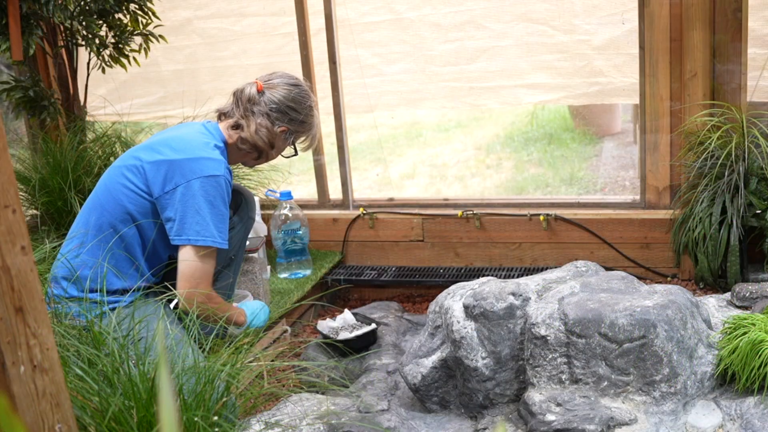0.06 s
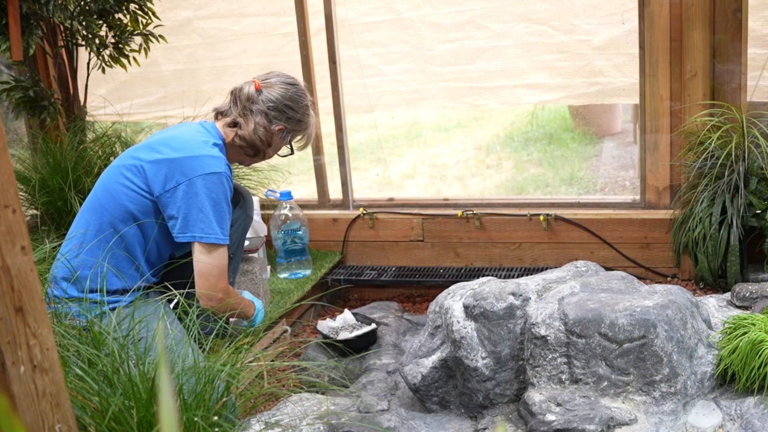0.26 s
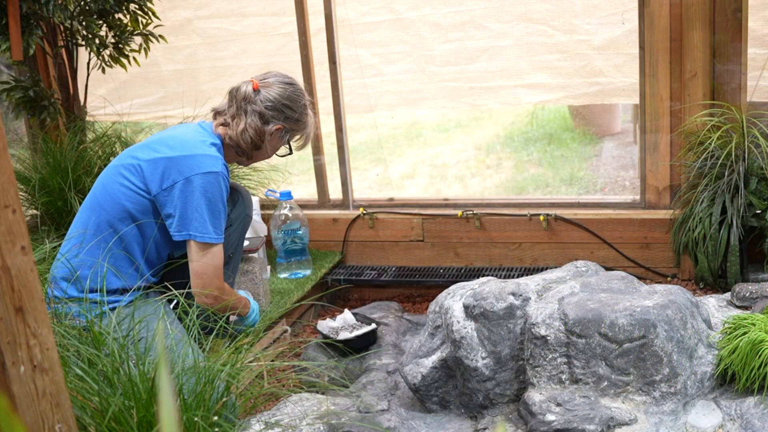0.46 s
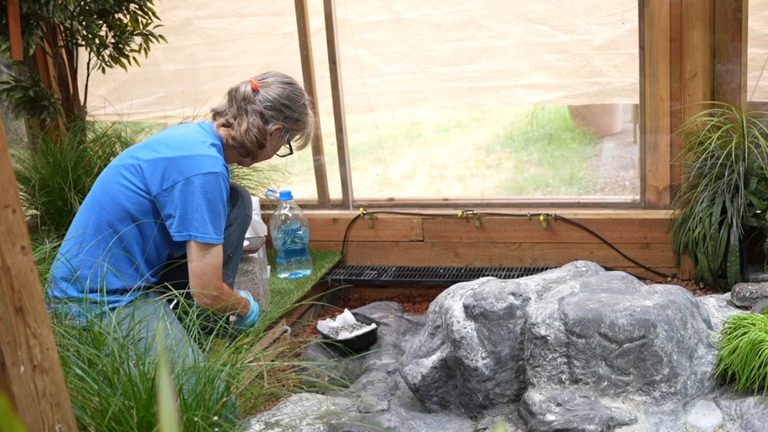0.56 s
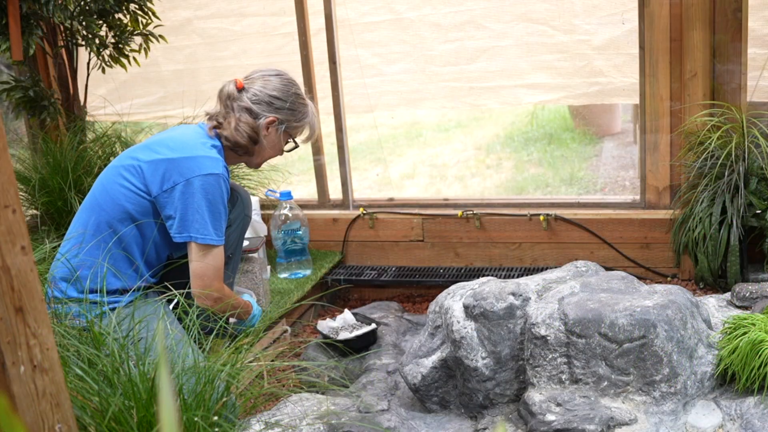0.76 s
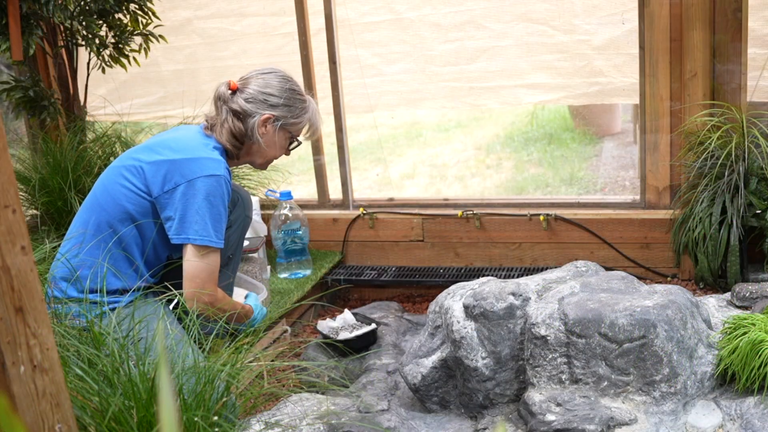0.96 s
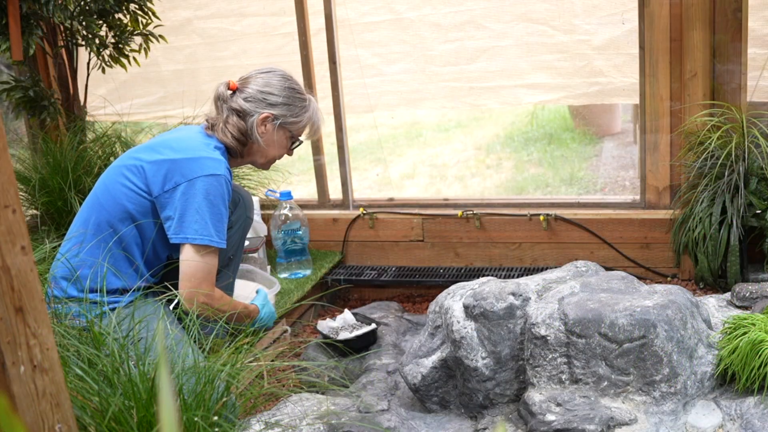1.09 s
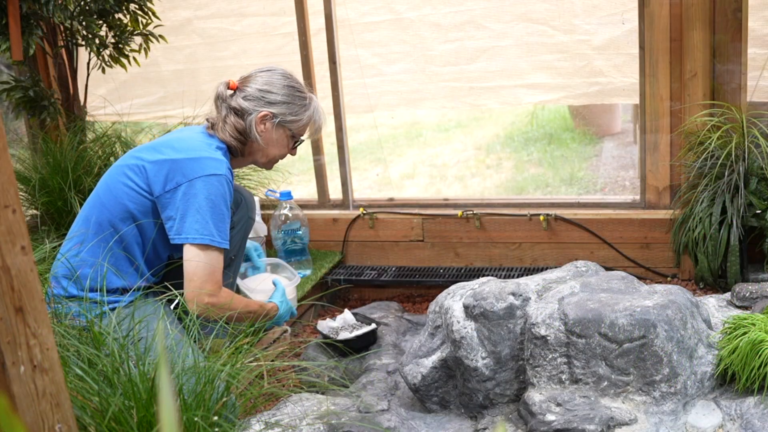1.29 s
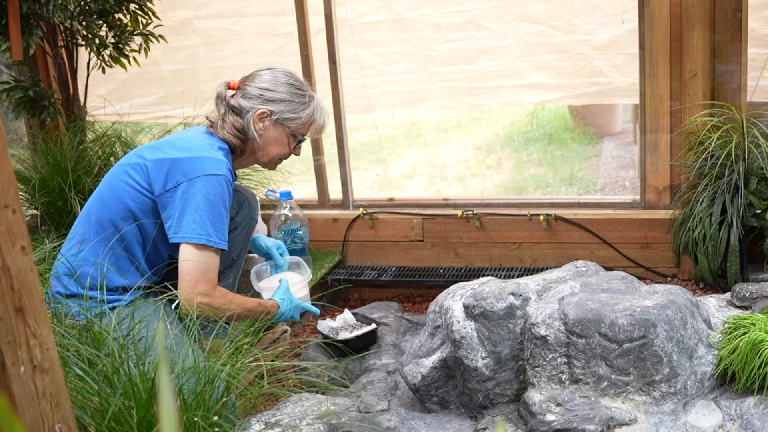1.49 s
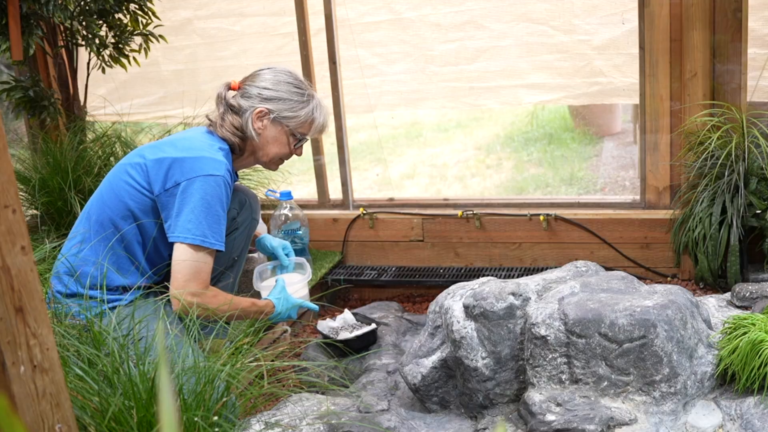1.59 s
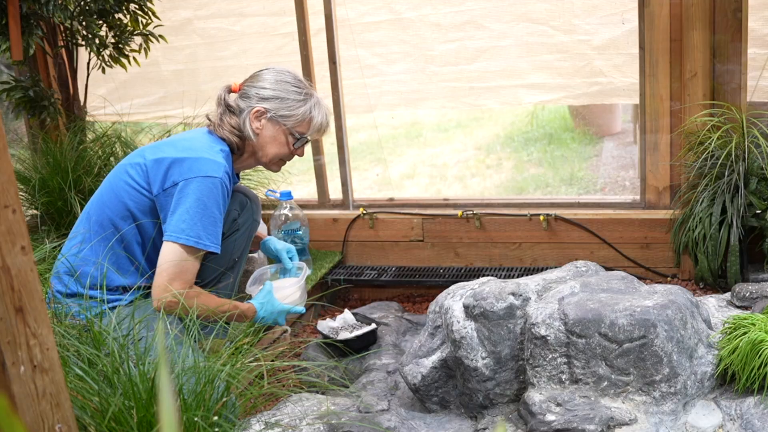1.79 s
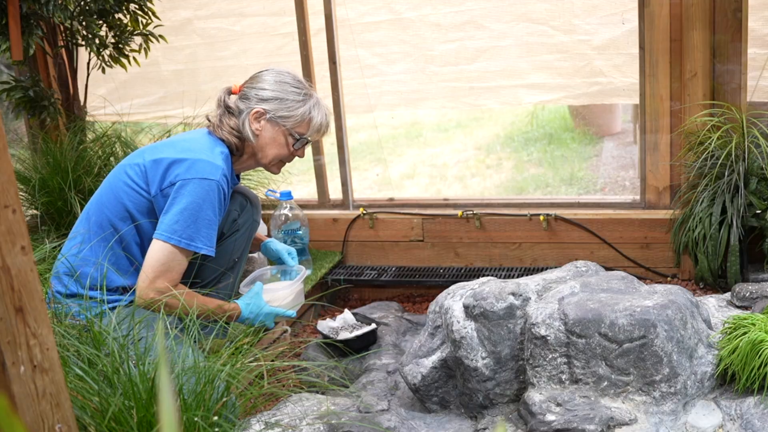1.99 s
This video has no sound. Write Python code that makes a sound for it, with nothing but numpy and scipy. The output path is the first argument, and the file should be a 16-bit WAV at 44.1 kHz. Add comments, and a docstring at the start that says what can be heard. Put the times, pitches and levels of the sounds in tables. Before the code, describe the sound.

Small finches give clear, high gliding chirps, slightly left, at about 0.2, 0.26 and 0.45 seconds, then a last one at 1.75, each blurred by glass panes and a short hall tail. A soft dull double bump falls at 0.3. A hand swishes through a bag from 0.5 to 0.9, then loose grain rustles and ticks, fading after 1.5. Faint steady pump hum and room air continue throughout.

```python
"""A glazed indoor aviary in which small finches chirp, their gliding sines ringing off panes and hall.
Close by something bumps softly (noise in dull resonances) and a hand swishes through a bag
(grainy noise with a sliding hollow). Loose grain rustles and ticks (tiny clicks and bursts of noise).
A pump hums faintly (wavering sine lines) over the air of the room (steady coloured noise)."""
import sys
import numpy as np
from scipy import signal
from scipy.fft import rfft, irfft, next_fast_len
from scipy.io import wavfile
from scipy.ndimage import map_coordinates

SR = 44100
rng = np.random.default_rng(int(sys.argv[2]) if len(sys.argv) > 2 else 0)


def store_pcm(level_fs):
    """Save levels as 16-bit WAV."""
    pcm = np.round(np.clip(level_fs, -1, 1) * 32767).astype(np.int16)
    wavfile.write(sys.argv[1], SR, np.atleast_2d(pcm).T)


def makeup_ratio(level_db):
    """Linear amplitude ratio for a level in decibels (20 dB per factor of ten)."""
    decades = np.asarray(level_db, float) / 20
    return 10 ** decades


N = 90404  # samples, about 2 s


def unit(x):
    """Scale to rms 1."""
    return x / np.sqrt(np.mean(x ** 2) + 1e-20)


def along(points, hz):
    """Read a curve of (Hz, value) points on a log frequency axis."""
    f, v = np.transpose(points)
    return np.interp(np.log(hz + 1), np.log(f + 1), v)


def curves(rows):
    """One value per sample for each column after the time."""
    s, *cols = np.transpose(rows)
    return [np.interp(np.arange(N) / SR, s, c) for c in cols]


def wobble(rate):
    """A smooth random curve, rate knots a second."""
    return map_coordinates(rng.standard_normal(N // 100), [np.arange(N) * rate / SR])


def filtered(x, response):
    """Filter x by a response given as a function of frequency."""
    m = next_fast_len(N + 8192)
    return irfft(rfft(x, m) * response(np.fft.rfftfreq(m, 1 / SR)), m)[..., :N]


def spread(pair, spectrum):
    """Two unrelated noises coloured and mixed to a left-right likeness, rms 1."""
    # How alike left and right are. Each row: frequency in Hz, correlation (1 is identical).
    likeness = [(40, .985), (120, .92), (350, .9), (700, .7), (1400, .52), (2800, .05), (6000, .1),
                (15000, .08)]

    def response(hz):
        turn = np.arccos(np.clip(along(likeness, hz), -1, 1)) / 2
        return makeup_ratio(along(spectrum, hz)) * [np.cos(turn), np.sin(turn)]

    mid, side = filtered(pair, response)
    return unit(np.array([mid + side, mid - side]))


def hall(x):
    """A fresh stereo noise tail in which each frequency dies at its own speed."""
    # Decay of the hall. Each row: frequency in Hz, time to fall 60 dB in seconds.
    decay = [(150, 0.43), (1500, 1), (5000, 0.44), (7000, 0.32), (14000, 0.42)]
    first_wall_s = 0.0056
    hz, t, z = signal.stft(rng.standard_normal((2, SR * 2 // 3)), SR, nperseg=256)
    tail = signal.istft(z * makeup_ratio(-60 * t / along(decay, hz)[:, None]), SR, nperseg=256)[1]
    tail = tail / np.linalg.norm(tail[0])
    tail = np.pad(tail, ((0, 0), (int(first_wall_s * SR), 0)))
    return signal.fftconvolve(x[None], tail, axes=1)[:, :N]


def rise_fade(s, db, rise, t60):
    """Linear rise from s to the level db, then an exponential fade of 60 dB in t60 seconds."""
    t = np.arange(N) / SR
    return makeup_ratio(db - 60 * np.clip(t - s - rise, 0, 9) / t60) * np.clip((t - s) / rise, 0, 1)


def burst(s, db, rise, t60, hz, width):
    """Stereo noise in one resonance, under a rise and a fade."""
    steps = hz + width * np.array([-4, -2, -1, -.5, 0, .5, 1, 2, 4, 8, 30])
    band = [(max(f, 5), -20 * np.log10(1 + (2 * (f - hz) / width) ** 2)) for f in steps]
    return rise_fade(s, db, rise, t60) * spread(rng.standard_normal((2, N)), band)


def near_panes(voice):
    """Eight sparse echoes a side within 20 ms, as from panes and posts, rms 1."""
    walls = np.zeros((2, int(.02 * SR) + 1))
    for side in walls:
        side[rng.integers(40, len(side), size=8)] = rng.choice([-1, 1], size=8)
    return unit(signal.fftconvolve(voice[None], walls, axes=1)[:, :N])


def finches():
    """Gliding whistles with a weak octave, each from its own perch, blurred by near panes and the hall."""
    # One list a chirp. Each row: time in seconds, pitch in Hz, level in dB,
    # second harmonic in dB relative to the first.
    chirps = [
        [(.186, 6300, -57, -33.5), (.193, 7280, -48, -31), (.201, 6850, -29.5, -31), (.205, 6020, -43, -24.5),
         (.208, 5220, -44.5, -20), (.211, 4230, -60, -38), (.213, 4240, -63.5, -41.5)],
        [(.259, 5760, -67, -58), (.265, 6136, -39, -21.5), (.28, 6183, -32.5, -43.5), (.297, 6666, -36, -50),
         (.32, 6618, -32.5, -58.5), (.333, 6400, -30.5, -23), (.34, 5860, -36.5, -37.5), (.344, 5050, -52, -50),
         (.348, 4460, -58, -54)],
        [(.45, 5070, -65, -26), (.458, 5300, -44, -13.5), (.47, 5680, -36, -32), (.485, 6180, -36.5, -22),
         (.498, 6534, -28.5, -42), (.51, 6560, -32, -33), (.525, 6465, -33, -47), (.534, 5950, -37, -58),
         (.543, 5360, -42, -52)],
        [(1.732, 7200, -63, -35), (1.744, 6690, -44.5, -51), (1.755, 6550, -47, -27), (1.775, 6790, -41, -11.5),
         (1.795, 7076, -32, -29), (1.815, 7024, -34, -35), (1.83, 6710, -37.5, -16), (1.845, 6050, -40.5, -57),
         (1.855, 5680, -61, -33)],
    ]
    # Perch of each chirp: left minus right in dB.
    perches = [-5, -8.5, -9.5, -6.5]
    panes_db, hall_db = -4, 3  # relative to the rms of the direct chirp
    flutter_db, edge_s = 1.5, .003  # random level flutter; soft start and stop
    out, t = np.zeros((2, N)), np.arange(N) / SR
    for rows, pan_db in zip(chirps, perches):
        hz, db, octave_db = curves(rows)
        phase = 2 * np.pi * np.cumsum(hz) / SR
        whistle = np.sin(phase) + makeup_ratio(octave_db) * np.sin(2 * phase)
        on = np.clip(np.minimum(t - rows[0][0], rows[-1][0] - t) / edge_s, 0, 1)
        voice = on * np.sqrt(2) * makeup_ratio(db + flutter_db * wobble(120)) * whistle
        direct = voice * makeup_ratio([[pan_db / 2], [-pan_db / 2]])
        room = makeup_ratio(panes_db) * near_panes(voice) + makeup_ratio(hall_db) * unit(hall(voice))
        out += direct + np.std(voice) * room
    return out


def bag_ring():
    """Noise in narrow resonances, a brief ring of the bag with some hall."""
    # Ringing of the bag. Each row: centre in Hz, width in Hz, relative level in dB.
    modes = [(1550, 50, -2), (1810, 90, 3)]
    start_s, hold_s, level_db = .637, .05, -51

    def response(f):
        return sum(makeup_ratio(g) * w * w / (w * w + 4 * (f - c) ** 2) / np.sqrt(w) for c, w, g in modes)

    u = (np.arange(N) / SR - start_s) / hold_s
    ring = makeup_ratio(level_db) * unit(filtered(rng.standard_normal(N), response))
    ring = ring * np.clip(8 * u, 0, 1) * np.exp(-4 * np.clip(u - 1, 0, 9))
    return ring + makeup_ratio(-7) * hall(ring)


def swish():
    """Grainy rubbing noise with a hollow resonance that slides, and a brief ring of the bag."""
    # The hand's strokes. Each row: time in seconds, level of the body in dB,
    # centre of the hollow in Hz, hollow over the body in dB.
    strokes = [(.44, -70.5, 1960, 2), (.48, -55.5, 1930, -8), (.52, -57.5, 3840, -1),
               (.56, -50, 3930, -4.5), (.585, -52.5, 3800, 4.5), (.61, -51.5, 2970, 4.5),
               (.635, -44, 2030, -25), (.655, -44.5, 4000, -1), (.70, -41.5, 2420, -6.5),
               (.74, -43, 2140, -13), (.8, -46, 1390, -22), (.85, -53, 1110, -3), (.93, -61.5, 1210, -24),
               (1.02, -71.5, 1220, -11)]
    # Colour of the rubbing. Each row: frequency in Hz, relative level in dB per Hz.
    body_colour = [(530, -57), (900, -22), (1360, -20.5), (1510, -12), (1850, -10), (2250, -11),
                   (6430, -12.5), (7850, -18.5), (15000, -26)]
    hollow_share = .17  # half width over centre
    db, centre_hz, hollow_db = curves(strokes)
    grain = makeup_ratio(1.2 * wobble(300) + 0.2 * wobble(24.6))
    body = spread(rng.standard_normal((2, N)) * grain, body_colour)
    hz, t, z = signal.stft(rng.standard_normal((2, N)) * grain, SR, nperseg=256)
    centre = np.interp(t, np.arange(N) / SR, centre_hz)
    peak = 1 / (1 + ((hz[:, None] - centre) / (hollow_share * centre)) ** 2) / np.sqrt(centre)
    a, b = signal.istft(z * peak, SR, nperseg=256)[1][:, :N]
    hollow = unit(np.array([a + 1.8 * b, 0.77 * (a - 1.2 * b)]))  # wide, a little louder on the left
    return makeup_ratio(db) * (body + makeup_ratio(hollow_db) * hollow) + bag_ring()


def thud():
    """Soft bumps on a dull body: one noise for each resonance, kicked by every bump."""
    # The bumps. Each row: start in seconds, level in dB before the gain of each resonance.
    bumps = [(.285, -49), (.302, -48), (.335, -60)]
    # The dull body. Each row: centre in Hz, width in Hz, gain in dB, time to fall 60 dB in seconds.
    modes = [(90, 38, -11, .7), (187, 130, -2, 0.26), (300, 170, 3, 0.33), (557, 190, -1.5, 0.54),
             (1050, 520, -3.5, 0.44), (1710, 1200, -7, .25)]
    rise_s = .002
    t = np.arange(N) / SR

    def kick(t60):
        power = 0
        for s, db in bumps:
            fade = makeup_ratio(db - 60 * np.clip(t - s, 0, 9) / t60)
            power = power + (fade * np.clip((t - s) / rise_s, 0, 1)) ** 2
        return np.sqrt(power)

    # a burst begun at -1 s with an endless fade is a steady noise
    return sum(kick(t60) * burst(-1, g, 1, 1e6, hz, width) for hz, width, g, t60 in modes)


def rustle():
    """Short slides of loose grain: dense tiny clicks under a rise and a fade, with scuffs and ticks."""
    # Slides of grain. Each row: start in seconds, level in dB, rise in seconds,
    # time to fall 60 dB in seconds.
    slides = [(.455, -76, 0.025, 0.9), (.84, -55.5, 0.025, 1), (.92, -58.5, 0.038, 0.45),
              (1.058, -60.5, 0.018, 0.58), (1.148, -54.5, 0.02, 0.69), (1.319, -57, 0.026, 0.68),
              (1.51, -63.5, 0.021, 0.53), (1.82, -89, .01, 0.089)]
    # Colour of the grain. Each row: frequency in Hz, relative level in dB per Hz.
    grain_colour = [(1180, -48), (2000, -7.5), (2590, -10), (2900, -13), (4690, -6.5), (6970, -2),
                    (15700, -8.5)]
    # Scuffs and ticks, noise in one resonance. Each row: start in seconds, level in dB,
    # rise in seconds, time to fall 60 dB in seconds, centre in Hz, width in Hz.
    scuffs = [(.465, -55.5, 0.017, 0.78, 780, 550), (0.549, -54, 0.01, 0.21, 850, 148),
              (.68, -54.5, 0.044, 1, 1165, 352), (.73, -57, 0.08, 0.27, 720, 250),
              (1.03, -64.5, 0.014, 0.9, 1410, 300), (1.04, -58, 0.019, 0.95, 2960, 2580),
              (1.066, -57.5, 0.0097, 0.63, 1050, 540), (1.073, -54.5, 0.0081, 0.64, 594, 300),
              (1.152, -52.5, .003, 0.13, 4820, 900), (1.184, -56.5, .01, 0.17, 4860, 1200),
              (1.27, -64.5, 0.018, 0.39, 1910, 200), (1.815, -61.5, 0.011, .25, 3900, 2500),
              (1.82, -69, 0.01, 0.28, 4100, 300)]
    grains_per_s = 2500  # in each channel
    shape = sum(rise_fade(*row) for row in slides)
    clicks = (rng.random((2, N)) < grains_per_s / SR) * rng.standard_normal((2, N))
    clicks = clicks + 0.36 * rng.standard_normal((2, N))  # fine hiss between the grains
    return shape * spread(clicks, grain_colour) + sum(burst(*row) for row in scuffs)


def pump():
    """Slightly unsteady sine lines, each wavering in level and pitch."""
    # Hum of the pump. Each row: frequency in Hz, rms level in dB ahead of panning.
    hum = [(118.4, -85.5), (279.9, -76), (312.2, -67), (349.9, -68), (387.6, -71), (506.0, -83.5),
           (597.5, -75), (694.4, -82.5), (769.8, -65)]
    waver_db, drift_hz = 0.5, 1.46
    t, lines = np.arange(N) / SR, np.zeros(N)
    for hz, db in hum:
        level = np.sqrt(2) * makeup_ratio(db + waver_db * wobble(8.79))
        cycles = hz * t + np.cumsum(drift_hz * wobble(12.73)) / SR + rng.random()
        lines += level * np.sin(2 * np.pi * cycles)
    return lines * makeup_ratio([[.6], [-.6]])  # slightly to the left


def room_air():
    """Coloured stereo noise, almost steady in level."""
    # Colour of the air. Each row: frequency in Hz, relative level in dB per Hz.
    air_colour = [(13, -69), (22, -21.5), (124, -5), (159, -11), (308, -4), (416, -12.5), (783, -12),
                  (976, -18.5), (1990, -23), (6320, -34), (7660, -36), (15700, -28.5)]
    level_db = -59
    return makeup_ratio(level_db + 0.2 * wobble(1.7)) * spread(rng.standard_normal((2, N)), air_colour)


def scene():
    """Birds, the handling sounds, pump and air."""
    return finches() + swish() + thud() + rustle() + pump() + room_air()


def roll_off(x):
    """The treble ends steeply here."""
    return signal.sosfilt(signal.butter(12, 15810, fs=SR, output="sos"), x)


def record(dry):
    """Two microphone ports: the left leads a little in the bass, and the top is cut off."""
    left_lead_s, lead_up_to_hz, top_hz = 2.5 / 44100, 1500, 15750

    def response(hz):
        # half the lead on each side; above lead_up_to_hz the phase stays constant
        phase = np.pi * np.minimum(hz, lead_up_to_hz) * left_lead_s
        return (hz < top_hz) * np.exp(1j * phase * np.array([[1], [-1]]))

    ports = filtered(dry, response)
    return roll_off(ports)


dry = scene()
out = record(dry)
store_pcm(out)
```